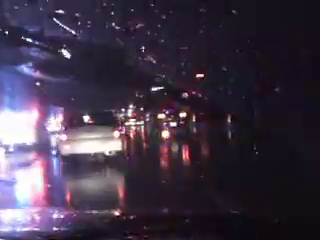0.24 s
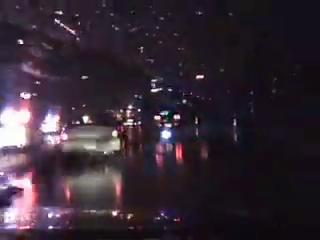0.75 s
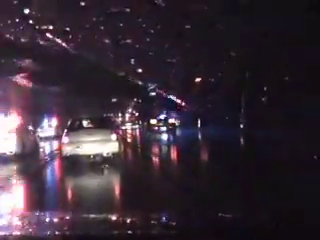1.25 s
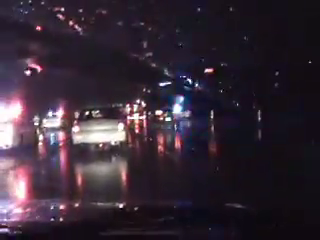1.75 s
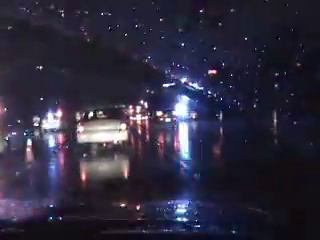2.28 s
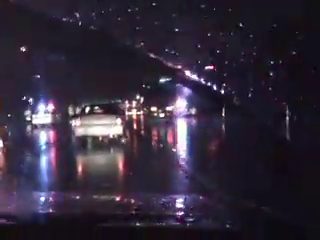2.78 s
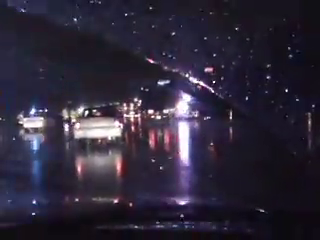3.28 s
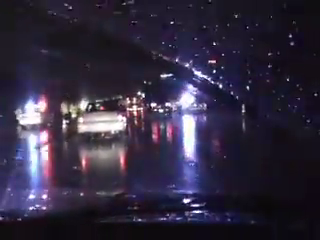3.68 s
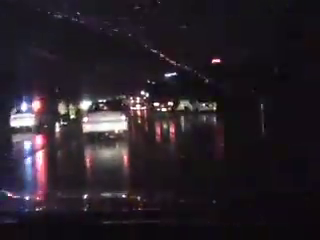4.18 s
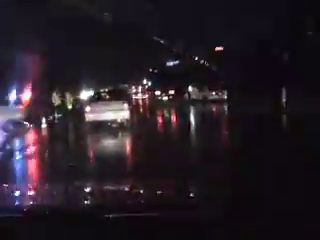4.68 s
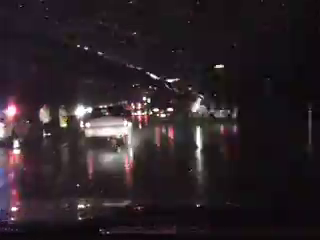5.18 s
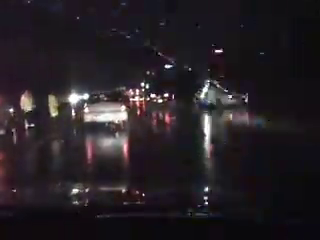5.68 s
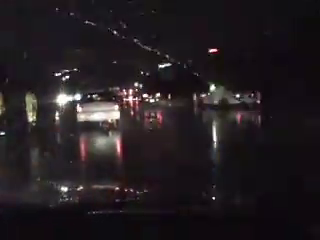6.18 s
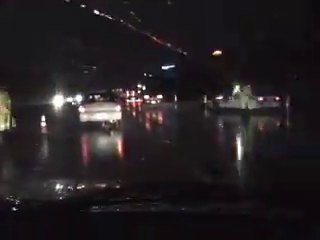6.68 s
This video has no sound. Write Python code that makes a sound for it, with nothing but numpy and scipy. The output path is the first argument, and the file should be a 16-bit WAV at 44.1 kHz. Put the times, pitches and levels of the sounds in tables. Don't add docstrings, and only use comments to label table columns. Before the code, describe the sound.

Inside a car driving slowly on a wet road, heard from a stereo microphone near the windshield. Deep boomy tyre rumble and soft hollow blower air run throughout, swelling slightly. Wipers turn with a dull clatter at about 0.1, 1.7, 3.3, 4.9 and 6.5 seconds; each time, a woody double knock follows half a second later and a low thud about 1.1 seconds later, until the end cuts the last cycle short. The engine hum climbs from 1 to 3.7 seconds, drops off around 4.4 with a faint rising gear whine, then pulls again from 5.5. Road joints thump low at 2.5, 3.3, 4.7, 5.5 and 5.9. Rain is sparse at first, with a small cluster of sharp ticks near 1.4, more drops at 3.3 and 4.2-4.8, then dense, bright pattering from 5.9 to the end, with dull roof taps among them.

```python
import sys
import numpy as np
from scipy import signal
from scipy.fft import rfft, irfft, next_fast_len
from scipy.io import wavfile
from scipy.ndimage import uniform_filter1d, map_coordinates

SR = 44100
rng = np.random.default_rng(int(sys.argv[2]) if len(sys.argv) > 2 else 0)


def natural_amplitude(level_db):
    exponent = np.asarray(level_db, float) / 20
    return 10 ** exponent


def master_out(mix):
    frames = np.transpose(np.atleast_2d(mix))
    ceiling = np.clip(frames, -1, 1)
    pcm = np.round(ceiling * 32767).astype(np.int16)
    wavfile.write(sys.argv[1], SR, pcm)


N = 306230
T = np.arange(N) / SR

# (time [s], level [dB])
RAIN_LEVEL = [(0.0, -40.5), (1.91, -40), (3.36, -37), (3.92, -40), (4.41, -36.5), (4.91, -39.5),
              (5.78, -36), (6.11, -35.5), (6.94, -30.5)]
# (time [s], peak [dB], brightness [dB], left-right [dB])
BIG_DROPS = [(1.2096, -21, -22, 3.0), (1.3768, -12.5, -27, 0), (1.4113, -18, -26, 2.0),
             (1.4822, -13, -19, 3.5), (3.2031, -18, -17, 6), (3.3205, -16, -21, 3.0),
             (4.0437, -23, -30, 3.0), (4.355, -26, -34, 3), (4.387, -14.5, -15, 7), (4.4958, -17, -15, 4),
             (4.6506, -17.5, -21, 6), (4.7401, -10.5, -16, -3), (4.8242, -15, -21, 2),
             (4.877, -18, -21, 3.5), (5.05, -19, -22, 3.5), (5.1627, -17, -33, 0), (5.656, -20, -27, 3),
             (5.9512, -10.5, -28, 6.0), (6.0192, -11, -18, 2), (6.1801, -13, -17, 5.0),
             (6.2176, -23, -11, 2.0), (6.2793, -10.5, -25, 3.5), (6.3684, -25, -29, -2),
             (6.415, -15, -18, 3.5), (6.4772, -16, -15, 3.0), (6.5884, -21.5, -26, 3),
             (6.632, -14, -20, 3.5), (6.6943, -19, -12, 4.0), (6.749, -16, -25, 1), (6.8857, -17.5, -24, 6)]
# (time [s], peak [dB], left-right [dB])
CLEAR_DROPS = [(0.4609, -23, 0), (0.7984, -21, 5), (0.9724, -25, 5), (1.0114, -20, 3), (1.08, -22, 1.5),
               (1.3613, -19, 1), (2.6404, -25, 1.5), (3.4585, -19, 0), (3.5856, -24, 1.5),
               (4.1894, -25, 4.5), (4.233, -23, 0), (4.4172, -22, 4), (4.45, -21.5, 3.5), (4.511, -16.5, 7),
               (4.56, -23, 3.0), (5.1824, -22, 5.0), (5.2323, -19, -1), (5.3286, -20.5, 6),
               (5.6381, -22, 4.0), (5.8042, -21, 4.0), (5.9153, -22, 1), (5.9934, -16.5, 4),
               (6.0427, -16, 8), (6.063, -13.5, 5), (6.257, -17.5, 4.0), (6.4465, -20, 3.5),
               (6.568, -26, 4.0), (6.6037, -16, 5.0), (6.7116, -18, 3.5), (6.9114, -19, 3.0)]
# (centre [s], length [s], rise over the rain [dB])
FLURRIES = [(.97, 0.13, 3.5), (1.414, 0.082, 4), (1.78, .05, 3), (3.3, 0.18, 0.5), (4.216, 0.14, 4.5),
            (4.51, 0.11, 3.5), (5.202, 0.23, 2.5), (5.638, 0.038, -0.5), (6.06, 0.048, 5.5),
            (6.18, 0.058, 5), (6.278, 0.031, 4.5), (6.535, 0.072, 1.5), (6.73, .06, 2.5),
            (6.896, 0.055, 0.5)]
# (frequency [Hz], level [dB])
GLASS_SPECTRUM = [(650, -24), (1100, -1.5), (1300, -2), (2130, -8.5), (2450, -4.5), (2850, -6),
                  (3350, -4.5), (4000, -8.5), (4800, -13), (8900, -23), (10300, -30.5), (11600, -46.5),
                  (15100, -80), (22000, -120)]
# (time [s], peak [dB], frequency [Hz])
ROOF_DROPS = [(1.012, -13.5, 1180), (1.392, -10.5, 1140), (1.4581, -15, 1320), (2.069, -16, 1180),
              (2.641, -13, 1130), (3.457, -16, 1320), (3.9155, -15, 1090), (4.2012, -19, 1290),
              (4.565, -14, 1240), (4.7402, -11.5, 1084), (4.825, -15, 1100), (5.994, -15, 1540),
              (6.9137, -15, 1420)]
# (flip [s], flip level [dB], delay to knock [s], knock level [dB], far turn level [dB])
WIPER_CYCLES = [(0.104, -12.5, .549, -11.5, -6.5), (1.71, -14, 0.55, -14, -7),
                (3.32, -13, 0.55, -12.5, -12), (4.935, -13.5, .541, -12, -7), (6.541, -13, .55, -13, -10)]
# (lag [s], frequency [Hz], level [dB], upper mode level [dB])
ARM_KNOCKS = [
    (0, 516, 0, -10),
    (.044, 512, -1, -11.5),
    (.066, 427, -5, -7),
]
# (multiple of main mode [1], level [dB], t60 [s])
ARM_MODES = [
    (.83, -16, 0.15),
    (0.999, 1.5, 0.09),
    (1.09, -10.5, 0.059),
    (2.3, -6, 0.019),
]
# (delay [s], frequency [Hz], level [dB], t60 [s])
COWL_BLOWS = [(0, 423, -7, 0.09), (.002, 535, -3, 0.029), (.006, 665, -17, 0.026), (.014, 333, -6, 0.16),
              (0.019, 209, -1.5, 0.071), (0.028, 275, -20, 0.072), (.037, 495, -8.5, 0.045),
              (.042, 630, -10, 0.021)]
# (time [s], firing rate [Hz], load level [dB])
ENGINE_PULLS = [(1.0, 111.4, -45), (1.25, 126, -29.5), (1.8, 156, -35), (2.15, 175.3, -35),
                (2.75, 193.2, -31), (3.3, 209.1, -33.5), (3.7, 211.5, -35), (4.2, 207.6, -38.5),
                (4.4, 200.4, -55), (5.3, 177.3, -45), (5.7, 186, -31), (6.1, 195.9, -32.5),
                (6.7, 204.3, -32.5), (6.94, 204.2, -36)]
# (multiple of firing rate [1], level under it [dB])
WEAK_ORDERS = [(0.5, -11.5), (1.25, -8.5), (1.5, -11.5), (2, -12)]
# (time [s], frequency [Hz], level [dB])
GEAR_WHINE = [
    (4.1, 338, -55),
    (4.35, 345, -34),
    (4.85, 368, -35),
    (5.1, 378, -57),
]
# (time
# [s], peak [dB], frequency [Hz])
LOW_THUMPS = [(1.738, -11.5, 161), (2.502, -4, 107.5), (3.34, -6, 122), (4.41, -12.5, 169),
              (4.745, -4, 70), (5.479, -8, 117), (5.879, -5, 74.4)]
# (time [s], level [dB])
TYRE_LOAD = [(0.0, -23.5), (0.44, -24.5), (2.22, -23.5), (2.59, -22.5), (2.9, -21.5), (4.41, -21.5),
             (6.94, -20.5)]
# (frequency [Hz], density [dB per Hz])
BOOM_SPECTRUM = [(15, -32), (25, -11), (55, 3.5), (92, 1), (137, -0.5), (220, -17), (290, -37), (480, -120)]
# (frequency [Hz], density [dB per Hz])
BODY_SPECTRUM = [(94, -22.5), (160, -0.5), (215, -5), (419, -2), (611, -10), (733, -16.5), (800, -16.5),
                 (1040, -69), (1760, -120)]
# (frequency [Hz], density [dB per Hz])
VENT_SPECTRUM = [(380, -32), (650, -4.5), (735, 1), (835, -9), (906, 1), (948, 2.5), (1170, -8.5),
                 (2200, -13.5), (2860, -14.5), (4840, -120)]
# (frequency [Hz], width [Hz], gain [dB])
CABIN_MODES = [(54.4, 7.8, -5.5), (70.4, 17, 2.5), (118, 18, 1), (247, 18, 2), (353, 27, 2),
               (425, 8.2, 3.5), (455, 10, -4), (734, 15, 2), (910, 40, 2), (969, 16, 2)]
# (frequency [Hz], correlation [1])
LIKENESS = [(60, 0.99), (170, 1), (370, 0.99), (700, 0.82), (1200, 0.89), (2500, 0.55), (5300, 0.51),
            (9500, 1), (11500, 1)]
# (frequency [Hz], left-right [dB])
PORT_LEAN = [(60, -0.5), (110, 0), (190, 1.5), (340, 1.5), (610, 2.5), (1090, 4.5), (1960, 3.5), (3500, 3),
             (6250, 2), (11200, -0.5)]
# (frequency [Hz], left lead [rad])
PORT_LEAD = [(30, .58), (85, 0.38), (250, 0.31), (700, 0.22), (1200, 0.31), (2600, -0.24), (5000, 0.43)]


def rain():
    level_db = curves(RAIN_LEVEL)[0]
    level_db = level_db + sum(db * np.exp(-2 * ((T - s) / long_s) ** 2) for s, long_s, db in FLURRIES)
    pane = causal(GLASS_SPECTRUM)
    big = big_drops(level_db, pane)
    power = big[0] ** 2 + big[1] ** 2
    crowd = np.sqrt(np.abs(signal.fftconvolve(power, np.hanning(500) / 500, "same")))
    near = natural_amplitude(level_db - 0.67) + 0.14 * crowd
    far = natural_amplitude(-40.0 + 0.36 * (level_db + 39.5)) * rush(GLASS_SPECTRUM, patchy_db=2.0)
    return big + near * patter(pane) + far


def big_drops(level_db, pane):
    out = np.zeros((2, N))
    clear = [(s, db + 1.0, -19.5, pan_db) for s, db, pan_db in CLEAR_DROPS]
    for s, db, bright_db, pan_db in [*BIG_DROPS, *clear, *middling_drops(level_db)]:
        drop = signal.fftconvolve(splat(0.0022, -14, 0.045, alike=1.44), pane, axes=1)

        def tint(hz):
            treble_db = (bright_db + 17.5) * np.clip((hz - 4000) / 3000, 0, 1)
            bass_cut_db = 9 * np.clip((2600 - hz) / 1300, 0, 1)
            return natural_amplitude(treble_db - bass_cut_db)

        side_db = (pan_db - 1.0) / 2 * np.array([[1], [-1]])
        add(out, s, natural_amplitude(db - 26 + side_db) * unit(filtered(drop, tint)))
    return out


def middling_drops(level_db, count=160):
    rate_per_s, over_rain_db, size_scatter_db = 22, 12.5, 3.5
    bright_db, bright_scatter_db, side_db, side_scatter_db = -19, 5, 3.5, 3
    gap = rng.exponential(size=count)
    size, bright, side = rng.standard_normal((count, 3)).T
    s = np.cumsum(gap) / rate_per_s
    db = np.interp(s, T, level_db) + over_rain_db + size_scatter_db * np.clip(size, -3, 1.5)
    bright = bright_db + bright_scatter_db * bright
    rows = np.transpose([s, db, bright, side_db + side_scatter_db * side])
    return rows[s < N / SR]


def patter(pane):
    out = np.zeros((2, N))
    for place in range(12):
        draw = rng.random((2, N))
        size_db = np.minimum(-4.5 * np.log(draw[1] + 1e-9), 13)
        chance = 60 / SR * natural_amplitude(3 * wobble(14))
        hits = (draw[0] < chance) * natural_amplitude(size_db)
        lean = natural_amplitude(rng.normal(0, 1.2) * np.array([[1], [-1]]))
        drop = unit(splat(0.0022, -15.5, 0.028, alike=1.06))
        out += lean * signal.fftconvolve(hits[None], drop, axes=1)[:, :N]
    return unit(signal.fftconvolve(flat(out), pane, axes=1)[:, :N])


def splat(ring_s, room_db, room_s, alike):
    t = np.arange(2000) / SR
    tick, shared, left, right = rng.standard_normal((4, len(t)))
    peak_s = 0.0006
    tick = tick * natural_amplitude(-60 * np.abs(t - peak_s) / ring_s * np.where(t < peak_s, 2.5, 1))
    delays_s = rng.uniform(0.00149, .004, size=2)
    echo = natural_amplitude(-8.5) * np.array([np.roll(tick, round(SR * s)) for s in delays_s])
    answer = uniform_filter1d(alike * shared + np.array([left, right]), size=3)
    answer = answer * natural_amplitude(room_db - 60 * t / room_s) * (1 - np.exp(-t / 0.0004))
    return tick + echo + answer


def roof():
    out, t = np.zeros(N), np.arange(1500) / SR
    for s, db, hz in ROOF_DROPS:
        add(out, s, ring(t, hz, db - 1, 0.015) + ring(t, 1.7 * hz, db - 13, 0.021))
    return out


def wipers():
    out, t = np.zeros(N), np.arange(SR // 6) / SR
    for s, flip_db, delay_s, knock_db, turn_db in WIPER_CYCLES:
        for lag_s, hz, arm_db, upper_db in ARM_KNOCKS:
            add(out, s + delay_s + lag_s, arm_knock(t, hz, knock_db + arm_db, upper_db))
        for blow_s, hz, level_db, t60 in COWL_BLOWS:
            add(out, s + blow_s, ring(t, hz * rng.normal(1, 0.021), flip_db + level_db + 2.0, t60))
        add(out, s + 0.0241, ring(t, 126.4, flip_db - 2.5, 0.14))
        add(out, s, scuff(t, 353, flip_db - 3.5, 0.24))
        turn = ring(t, 120, turn_db + 2.5, 0.1) + ring(t, 163, turn_db - 1.5, 0.096)
        add(out, s + 1.088, turn + ring(t, 894, turn_db - 18, 0.05))
    return out


def arm_knock(t, hz, db, upper_db):
    hz = hz * rng.normal(1, 0.014)
    out = ring(t, 642, db + upper_db, 0.062) + scuff(t, hz, db - 7, 0.12)
    for multiple, level_db, t60 in ARM_MODES:
        out += ring(t, multiple * hz, db + level_db - 0.5 + rng.normal(0, 0.63), t60)
    return out


def scuff(t, hz, db, t60):
    puff = filtered(rng.standard_normal(len(t)), lambda f: 1 / (1 + ((f - hz) / 220) ** 4))
    return unit(puff) * natural_amplitude(db - 60 * t / t60) * (1 - np.exp(-t / 0.0076))


def engine():
    lower_db, boom_hz, boom_width_hz, boom_gain_db = -11, 121.6, 31, 17
    hz, firing_db = curves(ENGINE_PULLS)
    off_boom = 2 * (3 / 4 * hz - boom_hz) / boom_width_hz
    lower_db = firing_db + lower_db + boom_gain_db / (1 + off_boom ** 4)
    phase = 2 * np.pi * np.cumsum(hz * (1 + .003 * wobble(10))) / SR
    weak = sum(natural_amplitude(db + 3.0 * wobble(7.1)) * np.sin(k * phase) for k, db in WEAK_ORDERS)
    firing = natural_amplitude(firing_db + 3 + 0.56 * wobble(6)) * (np.sin(phase) + weak)
    return firing + natural_amplitude(lower_db + 3 + 1.5 * wobble(6)) * np.sin(3 / 4 * phase)


def whine():
    hz, db = curves(GEAR_WHINE)
    return natural_amplitude(db + 1.5 * wobble(7.4)) * np.sin(2 * np.pi * np.cumsum(hz) / SR)


def bumps():
    out, t = np.zeros(N), np.arange(SR // 6) / SR
    for s, db, hz in LOW_THUMPS:
        add(out, s, ring(t, hz, db + 5.0, 0.088))
    return out


def road():
    boom_db, boom_growth, body_db, body_growth = -23.5, 1, -27, 1.1
    load_db = curves(TYRE_LOAD)[0]
    load_db = load_db - load_db.mean()
    shake = wobble(9)
    boom = natural_amplitude(boom_db + boom_growth * load_db + 0.37 * shake) * rush(BOOM_SPECTRUM, patchy_db=0.65)
    body = natural_amplitude(body_db + body_growth * load_db + 0.57 * shake) * rush(BODY_SPECTRUM, patchy_db=0.33)
    return boom + body


def blower():
    return natural_amplitude(-32.5 + 0.65 * wobble(3.24)) * rush(VENT_SPECTRUM, patchy_db=0.77)


def cabin(x):
    def gain(f):
        return natural_amplitude(sum(db / (1 + (2 * (f - hz) / width_hz) ** 2) for hz, width_hz, db in CABIN_MODES))
    return filtered(x, gain)


def ring(t, hz, db, t60):
    return natural_amplitude(db - 60 * t / t60) * (1 - np.exp(-t * hz * 0.77)) * np.sin(2 * np.pi * hz * t) * 1.04


def rush(spectrum, patchy_db):
    z = signal.stft(rng.standard_normal((2, N + 512)), nperseg=512)[2]
    field = uniform_filter1d(rng.standard_normal(z.shape[1:]), size=5, axis=0)
    field = uniform_filter1d(field, size=10, axis=1)
    pair = signal.istft(z * natural_amplitude(patchy_db * unit(field)), nperseg=512)[1][:, :N]

    def mid_side(hz):
        angle = np.arccos(np.clip(along(LIKENESS, hz), -1, 1)) / 2
        return natural_amplitude(along(spectrum, hz)) * [np.cos(angle), np.sin(angle)]

    mid, side = filtered(pair, mid_side)
    return unit(np.array([mid + side, mid - side]))


def unit(x):
    return x / np.sqrt(np.mean(x ** 2) + 1e-20)


def along(points, hz):
    f, v = np.transpose(points)
    return np.interp(np.log(hz + 1), np.log(f + 1), v)


def curves(rows):
    s, *cols = np.transpose(rows)
    return [np.interp(T, s, c) for c in cols]


def wobble(rate):
    return map_coordinates(rng.standard_normal(int(N * rate / SR) + 4), [T * rate])


def filtered(x, response):
    m = next_fast_len(x.shape[-1] + 8192)
    return irfft(rfft(x, m) * response(np.fft.rfftfreq(m, 1 / SR)), m)[..., :x.shape[-1]]


def causal(spectrum, size=4096):
    cepstrum = irfft(np.log(natural_amplitude(along(spectrum, np.fft.rfftfreq(size, 1 / SR))) + 1e-4))
    cepstrum[1:size // 2] *= 2
    cepstrum[size // 2 + 1:] = 0
    return irfft(np.exp(rfft(cepstrum)))[None, :size // 2]


def flat(x):
    z = rfft(x, next_fast_len(N))
    power = uniform_filter1d(np.mean(np.abs(z) ** 2, axis=0), size=1500)
    return irfft(z / np.sqrt(power))[:, :N]


def add(track, s, sound):
    part = track[..., round(s * SR):][..., :sound.shape[-1]]
    part += sound[..., :part.shape[-1]]


def scene():
    struck = rain() + roof() + wipers() + bumps()
    return struck + engine() + whine() + cabin(road() + blower())


def band_limit(x):
    return signal.sosfilt(signal.butter(12, 12250, fs=SR, output="sos"), x)


def record(dry):
    half = np.array([[.5], [-.5]])

    def port(hz):
        return natural_amplitude(along(PORT_LEAN, hz) * half) * np.exp(1j * along(PORT_LEAD, hz) * half)

    return band_limit(filtered(dry, port))


dry = scene()
out = record(dry)
master_out(out)
```